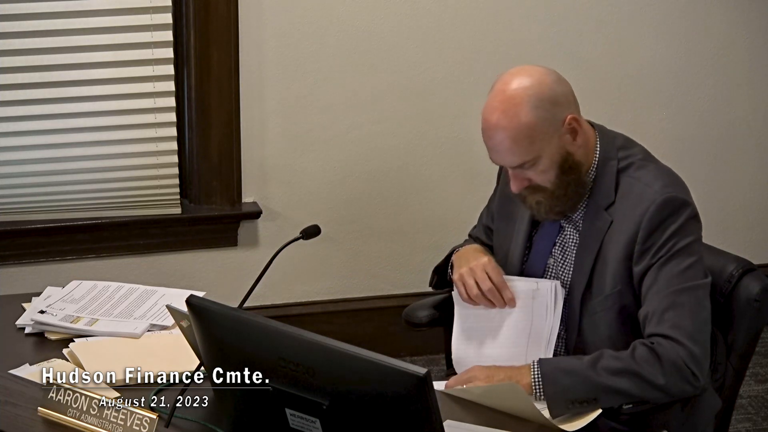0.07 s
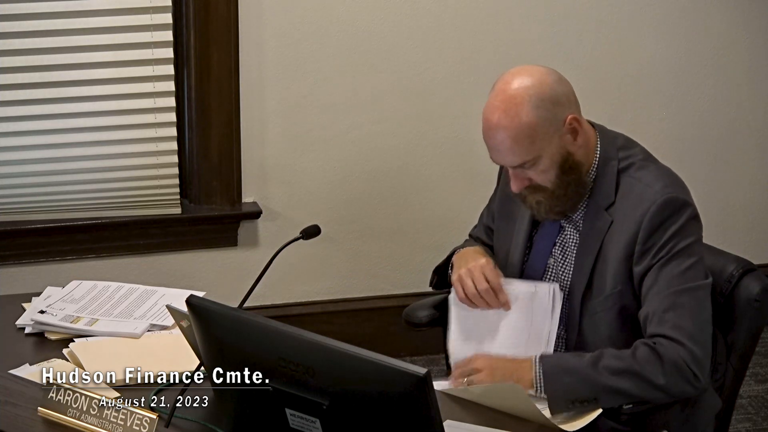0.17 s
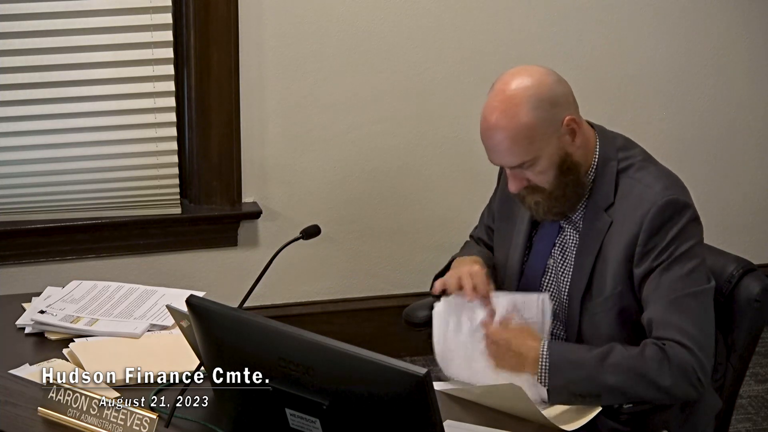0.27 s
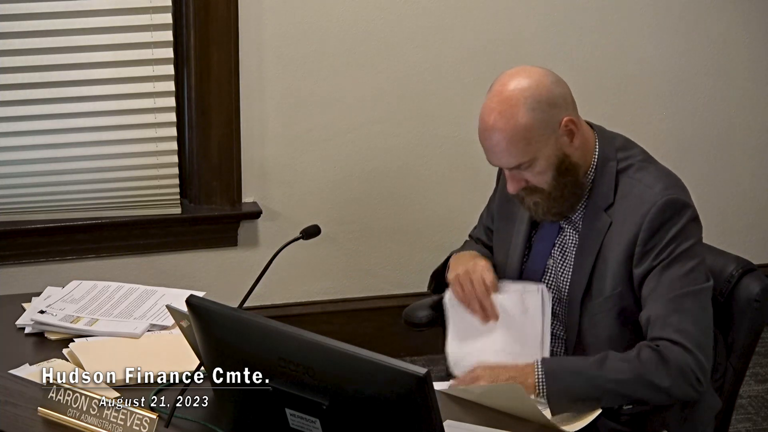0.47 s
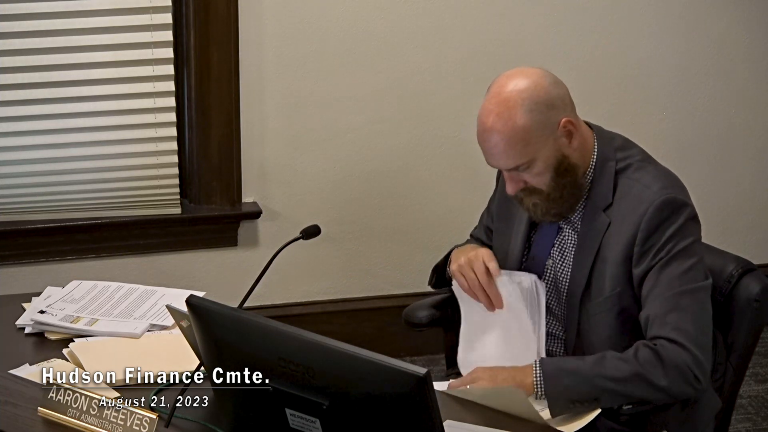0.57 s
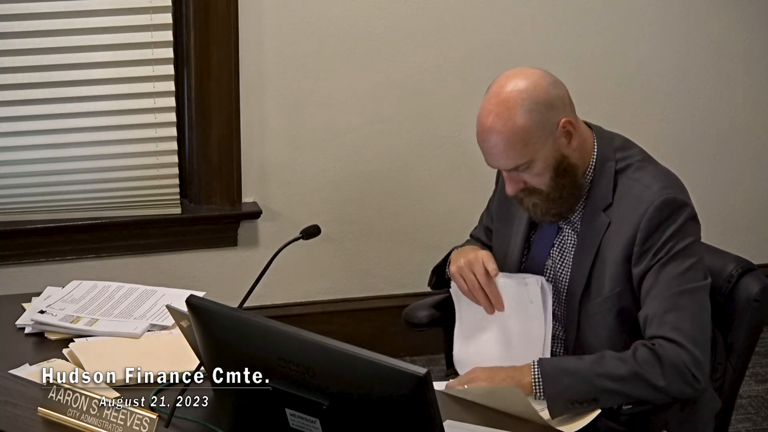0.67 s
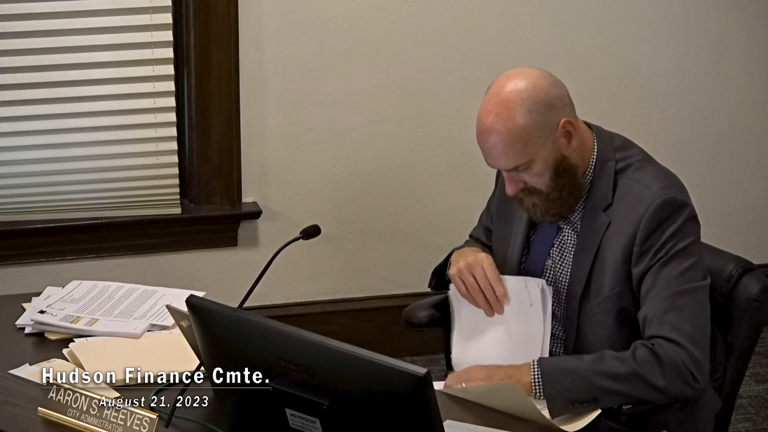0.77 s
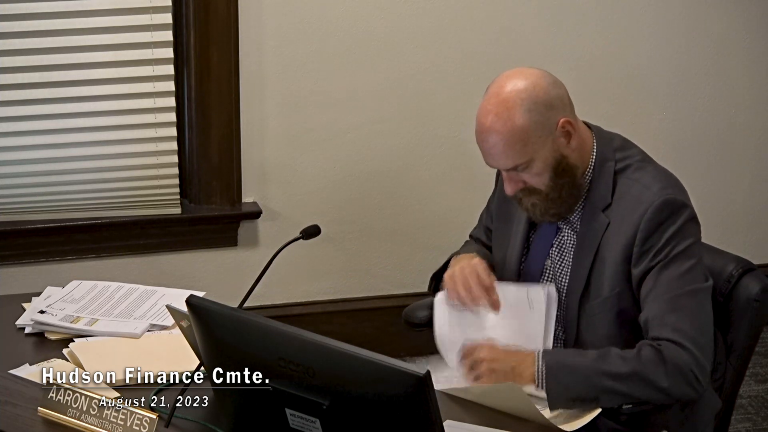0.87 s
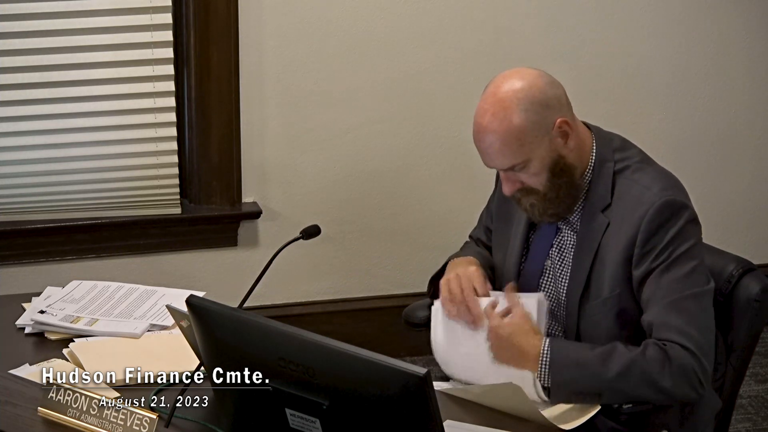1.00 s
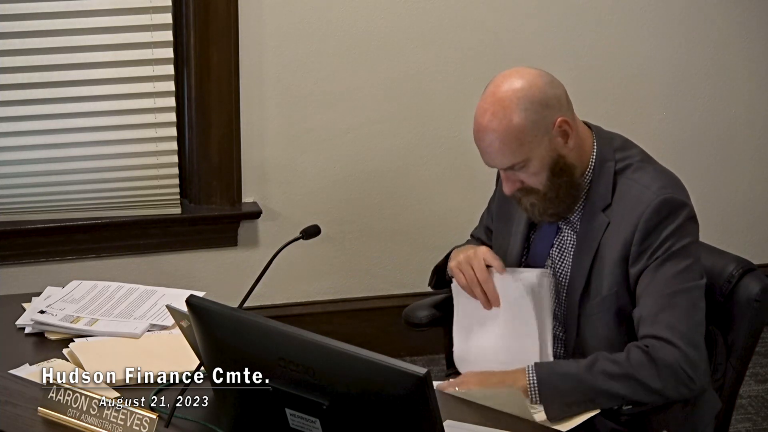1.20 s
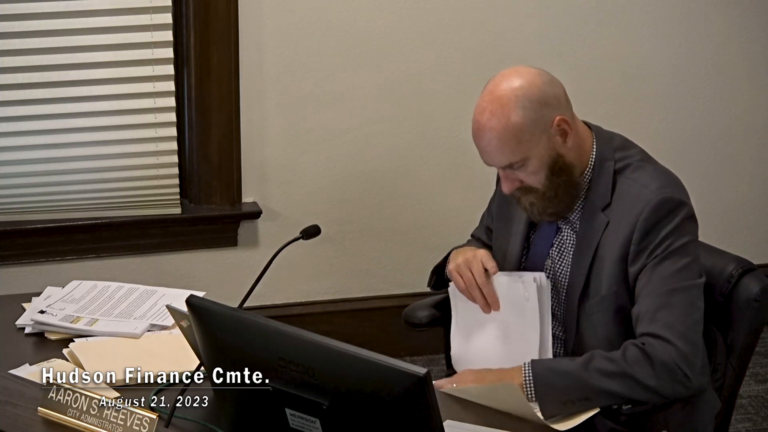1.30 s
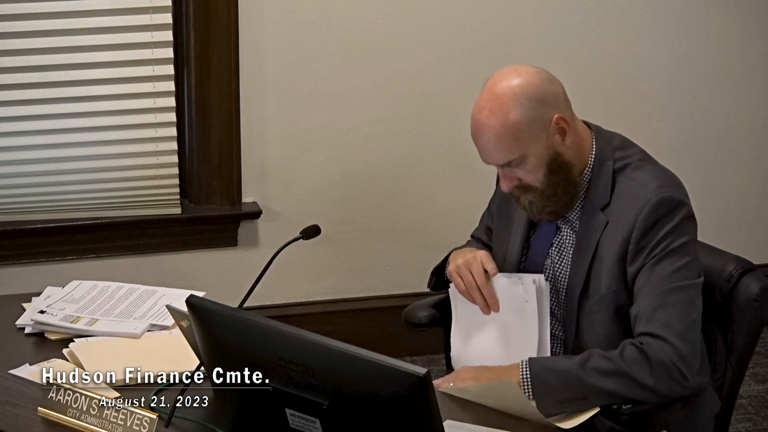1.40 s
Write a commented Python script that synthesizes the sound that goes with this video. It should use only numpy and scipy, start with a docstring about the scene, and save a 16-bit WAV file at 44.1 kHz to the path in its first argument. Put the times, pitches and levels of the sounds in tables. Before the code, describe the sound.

Sheets of paper are leafed through close to a desk microphone. From about 0.2 to 0.6 seconds they rustle, flap and snap, with soft puffs of air and dull desk bumps. After a brief lull, a light swish comes at 0.8 seconds, then more crisp flaps around 1 second. The stack bumps the desk near 1.2 seconds and the rustle eases. Faint ventilation rumbles in the room throughout.

```python
"""A meeting room, close to a desk microphone: sheets of paper are leafed through and squared up.
The sheets rub and hiss, buckle with hollow flaps and snap at their creases, all from tiny slips of
paper fibre. Edges swish past each other, swinging sheets push soft puffs of air, and the stack bumps
the booming desk top. A short room tail and a low ventilation rumble lie behind."""
import sys
import numpy as np
from scipy import signal
from scipy.fft import rfft, irfft
from scipy.io import wavfile

SR = 44100
rng = np.random.default_rng(int(sys.argv[2]) if len(sys.argv) > 2 else 0)


def int16_out(signal):
    """Quantize to a 16-bit WAV file."""
    q = np.round(np.clip(np.atleast_2d(signal).T, -1, 1) * 32767)
    wavfile.write(sys.argv[1], SR, q.astype(np.int16))


N = 63945
HZ, T = np.fft.rfftfreq(N, 1 / SR), np.arange(N) / SR


def amp(db):
    """Decibels to gain."""
    return 10 ** (np.asarray(db) / 20)


def unit_rms(x):
    """Scales to rms 1."""
    return x / np.sqrt(np.mean(x ** 2) + 1e-20)


def curve_at(points, hz):
    """Reads a curve on a log-frequency axis."""
    f, value = np.transpose(points)
    return np.interp(np.log(hz + 1), np.log(f + 1), value)


def equalise(x, eq):
    """Filters by an EQ curve in dB."""
    return irfft(rfft(x) * amp(curve_at(eq, HZ)), N)


def add(mix, start, sound):
    """Mixes a sound in at a start time in seconds."""
    part = mix[max(round(start * SR), 0):][:len(sound)]
    part += sound[:len(part)]


def slips(grain_db, size):
    """Grainy noise: dense tiny slips of paper fibre, of uneven strength."""
    noise, strength = rng.standard_normal((2, size))
    return noise * amp(grain_db * np.clip(strength, -3, 3))


def resonance(f, hz, octaves):
    """Gain of one broad resonance, falling steeply in the bass."""
    f = np.abs(f) + 1
    peak = (1 + (np.log2(f / hz) / octaves) ** 2 / 6) ** -2.2
    low_cut = f ** 2 / (f ** 2 + (hz / 6) ** 2)
    return peak / np.sqrt(f) * low_cut


def burst(length, hz, octaves, rise, fall, size=8192):
    """Grainy noise rings a resonance, dying away after `length` seconds; rms about 1 when fully open."""
    t = np.arange(size) / SR
    envelope = np.minimum(t / rise, 1) * np.exp(-np.maximum(t - length, 0) / fall)
    band = resonance(np.fft.rfftfreq(size, 1 / SR), hz, octaves)
    sound = envelope * irfft(rfft(slips(grain_db=4.5, size=size)) * band)
    sound = signal.sosfilt(signal.butter(2, hz / 10, "high", fs=SR, output="sos"), sound)
    return sound * np.sqrt(np.sum(envelope ** 2) / np.sum(sound ** 2))


# The bass-heavy tone of the ventilation. Each row: frequency in Hz, relative level in dB.
VENT_EQ = [(25, 0.5), (55, 0.5), (90, -3), (135, -5.5), (230, -19), (400, -24), (700, -24.5), (1500, -28),
           (3000, -37), (8000, -41.5), (16000, -43)]

def ventilation(air_db=-42.5, hum_hz=60.64, hum_db=-46.5):
    """The ventilation lays a steady bed of rumble, faint hiss and low hum."""
    air = unit_rms(equalise(rng.standard_normal(N), VENT_EQ))
    hum = unit_rms(np.sin(2 * np.pi * hum_hz * T))
    return amp(air_db) * air + amp(hum_db) * hum


# Early reflections off the desk and a screen. Each row: delay in seconds, gain.
REFLECTIONS = [(.0017, .15), (.0071, .1), (0.0139, .12)]
# How long the room rings. Each row: frequency in Hz, seconds to fall 60 dB.
TAIL_T60 = [(60, 1), (250, 0.52), (1000, 0.48), (3000, 0.47), (8000, 0.37), (16000, .12)]
# The tone of the tail. Each row: frequency in Hz, gain in dB.
TAIL_EQ = [(50, 2), (250, 1.5), (550, 4.5), (1000, 0.5), (2000, 1), (4000, -2), (16000, -7)]

def room(direct, tail_db=-13, build_s=0.027):
    """The room adds a few near reflections and a diffuse tail whose treble dies first."""
    hz, t, noise = signal.stft(rng.standard_normal(N), SR, nperseg=256)
    decay = amp(-60 * t / curve_at(TAIL_T60, hz)[:, None])
    tail = signal.istft(noise * decay, SR, nperseg=256)[1][:N]
    tail = equalise(tail / np.linalg.norm(tail), TAIL_EQ)
    tail *= np.minimum(T / build_s, 1) * (T < 1)
    out = direct + amp(tail_db) * signal.fftconvolve(direct, tail)[:N]
    for delay, gain in REFLECTIONS:
        add(out, delay, gain * direct)
    return out


# Soft, deep puffs of air. Each row: start in seconds, level in dB.
AIR_PUFFS = [(0.214, -35.5), (0.368, -44), (0.764, -42.5), (1.189, -34.5)]

def air_puffs():
    """A swinging sheet pushes air at the microphone."""
    out = np.zeros(N)
    for start, db in AIR_PUFFS:
        add(out, start, amp(db) * burst(length=0.031, hz=50.5, octaves=0.18, rise=0.015, fall=0.04))
    return out


# Dull bumps on the desk. Each row: start in seconds, length in seconds, level in dB, centre in Hz,
# width in octaves.
DESK_BUMPS = [(0.296, 0.0054, -24, 223, 0.67), (0.396, 0.006, -23, 540, .3), (0.513, 0.013, -31, 95, 0.2),
              (.805, .008, -37, 510, 0.08), (0.963, .02, -26.5, 443, 1.46), (1.161, 0.015, -22, 246, 0.62),
              (1.18, 0.0087, -22, 334, 0.87), (1.204, 0.0078, -31, 400, 0.88)]
# The desk top's modes. Each row: frequency in Hz, relative level in dB, seconds to fall 60 dB.
DESK_MODES = [(129, -3.5, 0.21), (163, -26, 0.51), (252, -15, 0.13), (410, -34, 0.052), (590, -11, 0.12)]
# Pushes that set the desk booming. Each row: start in seconds, gain in dB.
DESK_PUSHES = [(.5445, -21), (1.165, -30)]

def desk():
    """The stack or a hand bumps the desk, and a push rings the low modes of its top."""
    out = np.zeros(N)
    for start, length, db, hz, octaves in DESK_BUMPS:
        add(out, start, amp(db) * burst(length, hz, octaves, rise=0.0015, fall=0.0092))
    boom = sum(amp(db - 60 * T / t60) * np.sin(2 * np.pi * hz * T) for hz, db, t60 in DESK_MODES)
    for start, db in DESK_PUSHES:
        add(out, start, amp(db) * boom)
    return out


# Fader rides for the bright hiss and the lower rustle. Each row: time in seconds, level in dB.
HISS_FADER = [(0, -75), (.15, -72), (.175, -41.5), (.255, -35), (.3, -36), (.345, -53), (.45, -47.5),
              (.495, -36), (.575, -37.5), (.597, -59), (.625, -47), (.66, -55), (.735, -60), (.775, -40),
              (.805, -39), (.85, -40.5), (.93, -46.5), (.985, -41), (1.025, -48), (1.11, -44.5),
              (1.15, -40.5), (1.19, -35), (1.27, -44.5), (1.31, -49.5), (1.41, -51.5), (1.45, -39.5)]
RUSTLE_FADER = [(0, -90), (.15, -51.5), (.2, -42.5), (.25, -33), (.3, -30), (.38, -33), (.44, -33.5),
                (.5, -39.5), (.555, -32.5), (.62, -38), (.67, -54.5), (.745, -52), (.8, -36), (.83, -42),
                (.9, -42), (.955, -47.5), (.98, -29.5), (1.1, -36), (1.15, -37), (1.19, -28), (1.25, -34.5),
                (1.33, -43.5), (1.45, -54)]
# The tone of each layer. Each row: frequency in Hz, relative level in dB.
HISS_EQ = [(100, -27), (1000, -2.5), (2500, -4), (4500, -0.5), (7500, 1), (12000, -3.5), (14000, -7),
           (16000, -11)]
RUSTLE_EQ = [(40, -3), (200, -10.5), (350, -4), (540, 0.5), (800, 0.5), (1300, -4), (2100, -5.5),
             (3200, -9.5), (6000, -18), (16000, -24.5)]

def rubbing(fader, eq):
    """Sheet rubs on sheet: grainy friction that flutters and ticks as they catch and let go."""
    flutter_db, flutter_step_s = 1.5, 0.005
    ticks_per_s, tick_db, tick_spread_db, tick_decay_s = 130, -11.5, 2.5, 0.0009
    flutter = np.interp(T / flutter_step_s, np.arange(2000), rng.standard_normal(2000))
    catches = rng.random(N) < ticks_per_s / SR
    strength = amp(tick_spread_db * np.minimum(rng.exponential(1, N), 3))
    ticks = signal.lfilter([1], [1, -np.exp(-1 / (tick_decay_s * SR))], catches * strength)
    roughness = amp(flutter_db * flutter) + amp(tick_db) * unit_rms(ticks)
    friction = equalise(slips(grain_db=5.5, size=N) * roughness, eq)
    return unit_rms(friction) * amp(np.interp(T, *np.transpose(fader)))


# Short, bright swishes. Each row: start in seconds, length in seconds, level in dB, centre in Hz,
# width in octaves.
EDGE_SWISHES = [(0.206, 0.0067, -26, 3000, 1.4), (0.301, 0.015, -23.5, 11400, 0.37),
                (0.571, 0.016, -23.5, 5350, 0.49), (0.788, 0.025, -33, 3070, 0.75),
                (1.179, 0.0097, -26.5, 2200, 1.8)]

def edge_swishes():
    """An edge slides over a sheet: the friction swells, then stops quickly."""
    out = np.zeros(N)
    for start, length, db, hz, octaves in EDGE_SWISHES:
        add(out, start, amp(db) * burst(length, hz, octaves, rise=0.0061, fall=0.0016))
    return out


def crack(hz, octaves, size=8192):
    """One sudden slip strikes a sheet's resonance; energy 1."""
    gain = resonance(np.fft.fftfreq(size, 1 / SR), hz, octaves)
    log_gain = np.log(gain / gain.max() + 1e-3)
    spectrum = np.exp(np.conj(signal.hilbert(log_gain)))  # minimum phase keeps the attack sharp
    sound = np.fft.ifft(spectrum).real
    return sound / np.linalg.norm(sound)


# Crisp snaps. Each row: start in seconds, level in dB, centre in Hz, width in octaves,
# decay in seconds, the crack's share of the energy from 0 to 1.
CREASE_SNAPS = [(.094, -43.5, 5130, 1.6, 0.0018, 0.2), (0.2115, -11.5, 2780, 1.2, 0.0018, 0),
                (0.2222, -31, 5000, 1.9, 0.0012, 0.3), (0.2832, -16, 3100, 0.35, .0012, 0.3),
                (.307, -18, 1800, 0.72, 0.00036, 0.8), (0.3175, -9.5, 8900, 0.78, 0.001, 0.03),
                (0.481, -25, 4200, 2.2, 0.0016, 0.77), (.528, -21, 5630, 0.6, 0.0013, 0.5),
                (0.5427, -24.5, 1020, 0.89, 0.0013, 0.4), (0.608, -30.5, 11000, 1, .001, 0.2),
                (.843, -29, 8900, 1.2, 0.00037, 0.4), (0.9811, -13, 3970, 0.64, 0.00078, 0.2),
                (1.0404, -7, 1250, 1.06, 0.00057, 0.72), (1.0464, -20, 11000, 0.7, 0.00093, 0.3),
                (1.1185, -26, 1790, 1.7, 0.0019, 0.45), (1.251, -15, 11000, 0.85, 0.0014, 0),
                (1.252, -23.5, 2000, 1.2, 0.0017, 0.14)]

def crease_snaps():
    """A crease or corner snaps with one crack and a spray of slips."""
    out = np.zeros(N)
    for start, db, hz, octaves, decay, share in CREASE_SNAPS:
        spray = np.sqrt(1 - share) * burst(decay / 2, hz, octaves, rise=0.00059, fall=decay)
        click = np.sqrt(share * decay * SR) * crack(hz, octaves)
        add(out, start, amp(db) * (click + spray))
    return out


# Hollow flaps. Each row: start in seconds, attack in seconds, length in seconds, level in dB,
# centre in Hz, width in octaves, crackle in dB relative to the flap.
SHEET_FLAPS = [(0.2628, 0.0088, 0.0083, -14, 960, 0.36, -17),
               (0.2823, 0.00033, 0.0033, -17, 1260, 0.77, -22),
               (0.2947, 0.0048, 0.013, -17.5, 1410, 1, -9.5),
               (0.3238, 0.00042, 0.0012, -18, 1690, 0.48, -8),
               (0.328, 0.0021, 0.0058, -20.5, 1700, 1.1, -19), (0.343, 0.003, 0.0081, -21, 1900, 0.16, -23),
               (0.354, 0.0094, 0.0087, -15, 2320, 0.57, -12.5),
               (0.3909, 0.0003, 0.0018, -14, 1890, 0.95, -27), (.397, 0.0015, .01, -19, 1760, 1.2, -32),
               (0.417, 0.0016, 0.0043, -20, 2090, 0.15, -9.5),
               (0.433, 0.00045, 0.0016, -22.5, 1600, 1, -14), (0.595, 0.0047, 0.0067, -18, 1940, 0.65, -29),
               (.966, 0.0015, 0.0021, -13, 825, 0.66, -10.5), (0.971, 0.0018, 0.012, -20, 1300, 0.54, -10),
               (0.983, 0.00075, 0.019, -24, 1050, 0.94, -11), (1.0063, .003, .011, -18, 1480, 0.57, -31),
               (1.0337, 0.00064, 0.002, -20.5, 1080, 0.67, -3.5),
               (1.046, 0.0015, 0.0075, -21, 1380, 0.17, -29),
               (1.084, 0.00066, 0.0074, -21, 1070, 0.85, -20)]

def sheet_flaps():
    """A sheet buckles, giving a hollow flap with fine crackle on top."""
    out = np.zeros(N)
    for start, rise, length, db, hz, octaves, crackle_db in SHEET_FLAPS:
        body = burst(length, hz, octaves, rise, fall=0.0046)
        crackle = burst(length, hz=6750, octaves=1, rise=rise, fall=0.0016)
        add(out, start, amp(db) * (body + amp(crackle_db) * crackle))
    return out


def scene():
    """Paper and desk sound in the room; the puffs and the ventilation stay dry."""
    handling = sheet_flaps() + crease_snaps() + edge_swishes() + desk()
    friction = rubbing(HISS_FADER, HISS_EQ) + rubbing(RUSTLE_FADER, RUSTLE_EQ)
    return (room(handling + friction) + air_puffs() + ventilation())[None]


# The desk microphone's warm tone. Each row: frequency in Hz, gain in dB.
MIC_EQ = [(30, -6), (150, 3), (400, 3), (560, 0), (750, -2.5), (1200, -1.5), (2000, 0), (3200, -1.5),
          (6000, -1.5), (12000, 1), (15500, -3)]
HIGH_CUT_HZ = 15900

def record(dry):
    """The microphone colours the sound, and a steep low-pass trims the very top."""
    low_pass = signal.firwin(401, HIGH_CUT_HZ, window=("kaiser", 9), fs=SR)
    return signal.oaconvolve(equalise(dry[0], MIC_EQ), low_pass, "same")[None]


dry = scene()
out = record(dry)
int16_out(out)
```